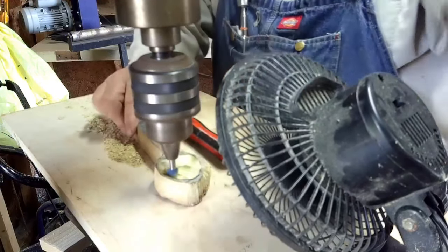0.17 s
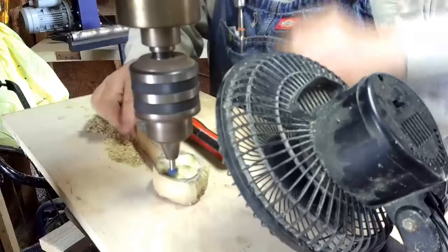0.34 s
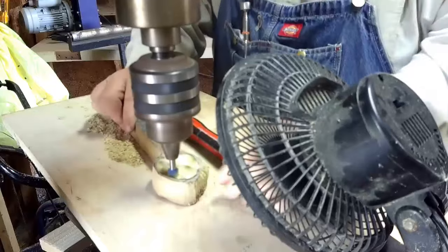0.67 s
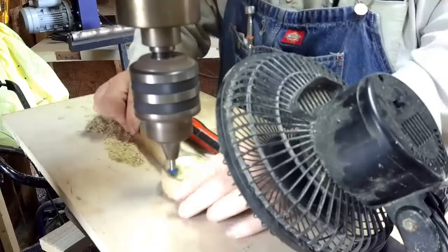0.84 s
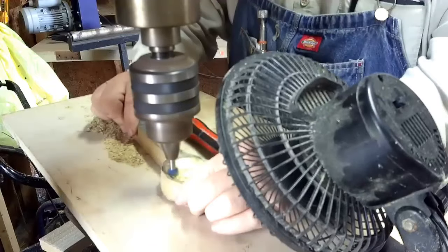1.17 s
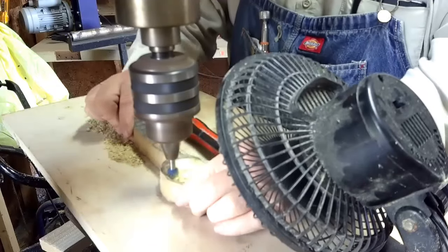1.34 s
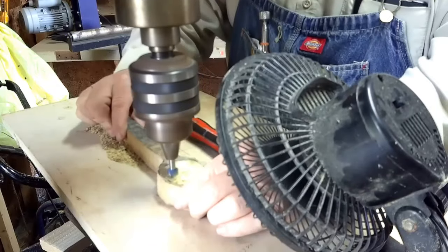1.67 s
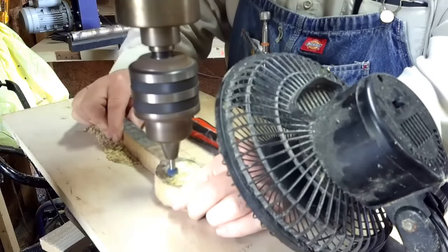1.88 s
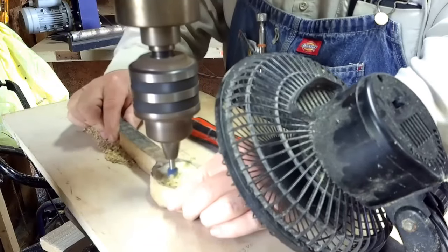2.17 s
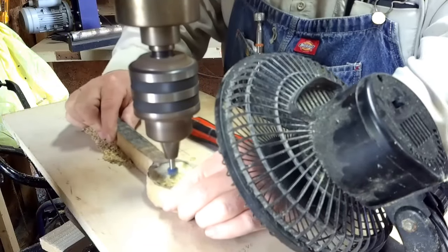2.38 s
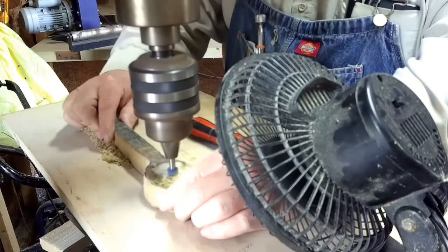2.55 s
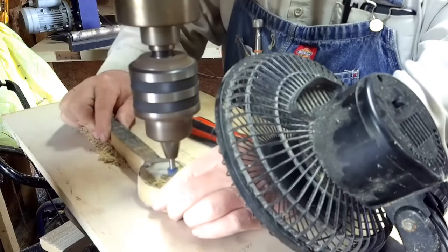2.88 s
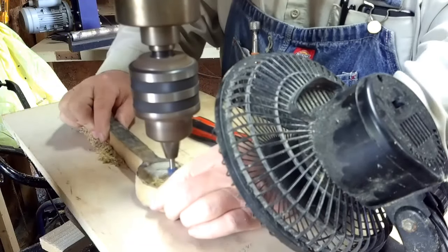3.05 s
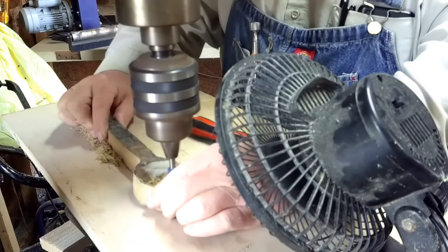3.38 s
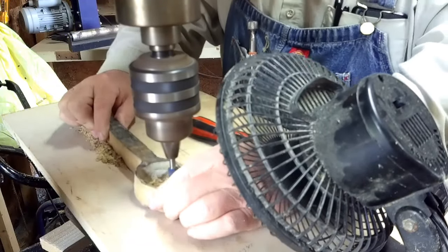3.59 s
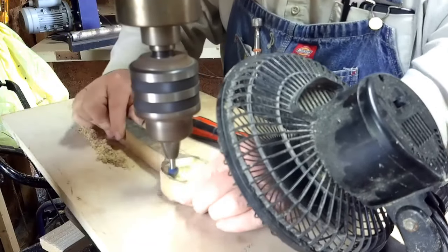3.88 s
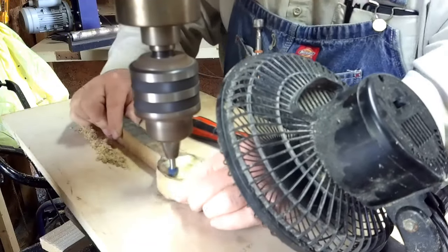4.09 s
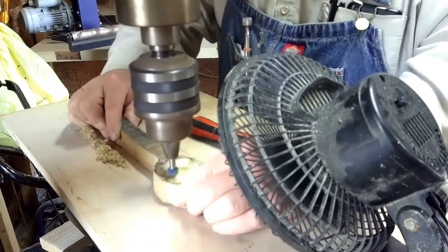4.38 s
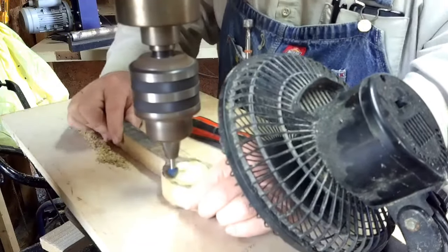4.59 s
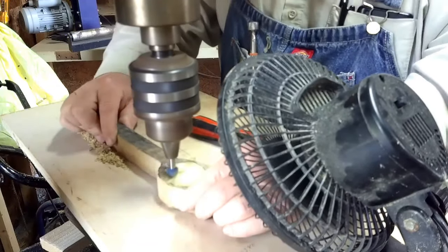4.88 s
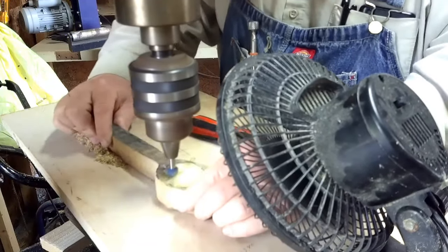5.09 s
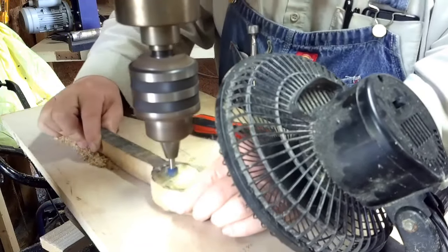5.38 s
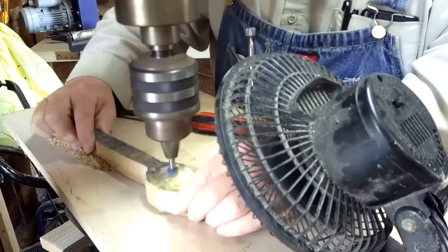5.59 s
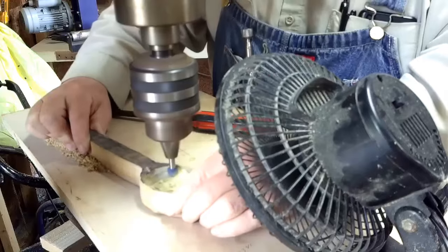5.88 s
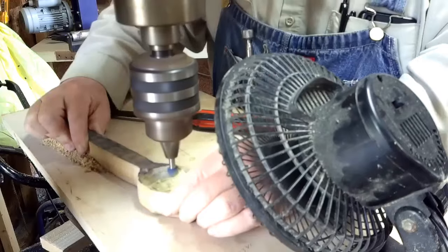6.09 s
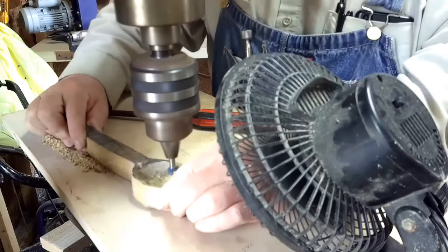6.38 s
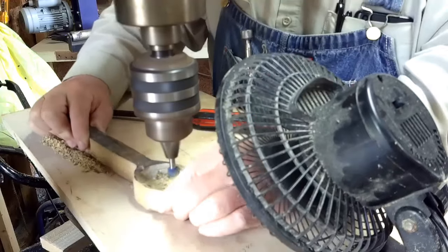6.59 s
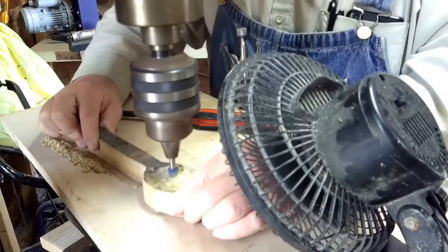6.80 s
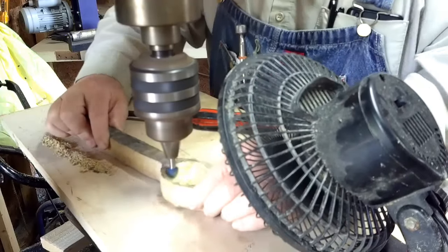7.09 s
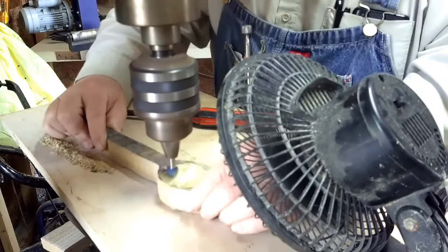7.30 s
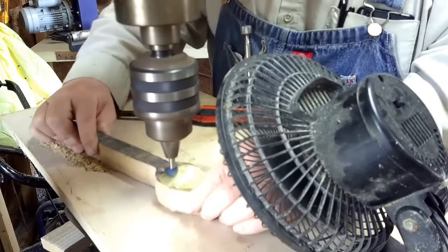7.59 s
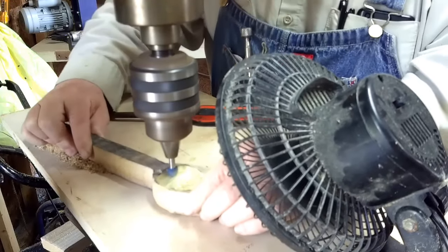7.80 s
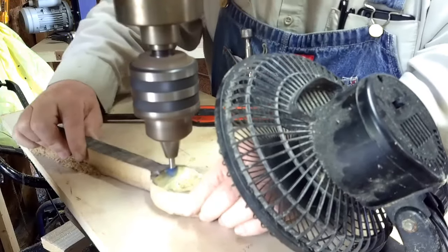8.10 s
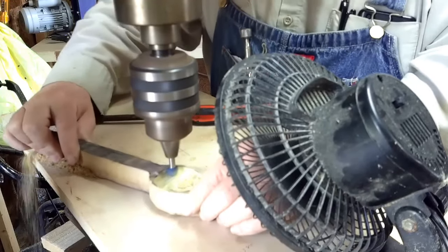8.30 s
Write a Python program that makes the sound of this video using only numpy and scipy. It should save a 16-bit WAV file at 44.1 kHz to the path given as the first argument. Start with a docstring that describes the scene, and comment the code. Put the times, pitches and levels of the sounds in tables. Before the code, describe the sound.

Close, sped-up wood carving on a drill press: a steady high whine, with repeated passes of buzzing hiss, squeals and short scrapes.

```python
"""A drill press spins a small carving burr in a block of wood, close up and in mono.
First it grinds in real time: the motor hums, rubbing rings the press, and the burr catches as it plunges.
After a short gap the work runs as a time-lapse, with hum and ringing pitched up by one factor.
Now, pass after pass, side pressure draws a whine from the spindle, the teeth strike into a pitched hiss,
and the block sings and chatters. Short scrapes and faint air from a bench fan run through both parts."""
import sys
import numpy as np
from scipy import signal
from scipy.fft import rfft, irfft, next_fast_len
from scipy.io import wavfile
from scipy.ndimage import uniform_filter1d

SR = 44100
rng = np.random.default_rng(int(sys.argv[2]) if len(sys.argv) > 2 else 0)


def file_out(sig):
    """Save sig as 16-bit WAV at sys.argv[1]."""
    # one column per channel
    cols = np.atleast_2d(sig).T
    # limit, then scale
    lim = np.clip(cols, -1, 1)
    pcm = np.round(lim * 32767).astype(np.int16)
    wavfile.write(sys.argv[1], SR, pcm)


N = 372644
T = np.arange(N) / SR

LAPSE = 3.729  # speed-up of the time-lapse; there it multiplies every f/Hz not marked "as heard"
REAL_END_S, LAPSE_START_S = 0.803, 0.821
SPINDLE_HZ = 52.96  # turns a second in real time

# resonances of press, table and block: f/Hz, width/Hz, height/dB
PRESS_RINGS = [(205.5, 9, 12.5), (241, 9.5, 22), (282.6, 21.2, 19.5), (315.7, 9.3, 15), (368.3, 33, 15.5),
               (421, 20, 12), (465, 14, 14), (528, 28.5, 8), (583, 8, 6.5), (619, 42, 8), (719, 21, 10.5),
               (760, 51, 7), (872, 123, 14.5), (996, 97, 8), (1180, 31, 4.5), (1271, 48, 8.5),
               (2030, 45, 4.5), (2650, 22, 7.5), (2776, 69, 5), (3020, 30, 0), (3530, 170, 6.5),
               (3900, 80, -7), (4530, 150, 7.5)]
# noise bed under the resonances, in real time and in the time-lapse: f/Hz, base level/dB per Hz
BED_REAL = [(25, -86), (80, -84), (130, -57), (200, -56), (300, -50), (560, -53), (1000, -50),
            (1250, -52.5), (1500, -50.5), (2050, -55), (2500, -53), (5100, -53), (6100, -65.5), (8300, -68),
            (9500, -78), (15500, -92)]
BED_LAPSE = [(16, -92.5), (60, -84), (90, -82.5), (125, -73.5), (180, -74.5), (260, -74.5), (480, -64),
             (900, -65), (1400, -65.5), (1900, -68.5), (2500, -65), (3200, -62.5), (3800, -67),
             (4200, -63.5)]
# force of the block on the burr in real time, a light touch and then the plunge: t/s, level/dB
FEED_FORCE = [(0, -4), (.04, -10), (.065, -4.5), (.12, -1.5), (.155, -8.5), (.28, -5), (.375, 2), (.5, 5.5),
              (.58, 3.5), (.67, -1.5), (.72, 4), (.8, 0.5)]
# the hand lets up for a moment: t/s, length/s, depth/dB
LET_UPS = [(0.861, 0.056, -8), (6.133, .19, -3.2)]
# passes of the burr round the hollow: start/s, end/s, whine gain/dB, squeal gain/dB, bite gain/dB
PASSES = [(.92, 1.522, -34.5, -41, -27.5), (1.533, 1.74, -30.5, -34, -27.5), (1.74, 2.143, -31, -40, -29.5),
          (2.163, 2.948, -29.5, -40, -31.5), (2.963, 3.35, -30.5, -48, -28.5),
          (3.354, 3.493, -36, -41, -29), (3.505, 3.62, -30, -37, -41), (3.717, 3.84, -32, -46, -30),
          (4.433, 4.626, -37, -43, -28.5), (4.633, 5.023, -30.5, -39, -30.5),
          (5.035, 5.33, -33.5, -38, -33), (5.33, 6.22, -32.5, -34.5, -29), (6.2, 6.617, -41, -42, -29.5),
          (6.802, 6.917, -28.5, -29.5, -31), (7.035, 7.2, -30, -29.5, -29), (7.22, 7.39, -30.5, -33, -31),
          (7.405, 7.862, -35, -30, -33.5), (7.858, 8.5, -37, -28, -36.5)]
# colour of one strike of the teeth: f/Hz, relative level/dB
STRIKE_COLOUR = [(300, -34), (800, -22), (1200, -4), (1400, -1), (1650, 2.5), (2000, 1), (2500, -0.5),
                 (2750, -4.5), (3200, -0.5), (4200, -13.5)]
# partials of the loaded spindle: multiple of its speed, level/dB against the whine gain
WHINE_PARTIALS = [(4, -16), (6, -12.5), (7, 1.5), (8, -21), (9, -27), (11, -14), (12, -5), (20, -8.5),
                  (22, -13), (24, -12)]
# the block sings as the teeth bite, the lowest tone at their strike rate:
# f/Hz as heard, level/dB against the bite gain, unsteadiness/0-1, waver/Hz
BITE_TONES = [(395, -31.5, 0.35, 2.2), (4220, -13.5, 0.8, 80), (7490, -9, 0.83, 100)]
# rough edge of the squeal: f/Hz as heard, level/dB against the squeal gain, unsteadiness/0-1, waver/Hz
SQUEAL_TONES = [(395, -22.5, 0.74, 2.4), (1942, -4, 1, 44), (2756, -7, 0.4, 15)]
# the block chatters and squeals under the burr: t/s, length/s, f/Hz as heard, level/dB, unsteadiness/0-1
CHATTER_TONES = [(.95, 0.71, 395, -52, .2), (1.74, .42, 767, -39, 0.53), (1.713, 0.46, 1930, -26, 0.95),
                 (1.878, 0.45, 2387, -30.5, 0.96), (2.3, 1.4, 797, -46, 0.4), (2.3, 0.85, 1274, -48, .3),
                 (3.0, .48, 7470, -32, 1), (3.15, 0.38, 6680, -33, 0.9), (3.15, 0.35, 5900, -34, 0.8),
                 (4.55, 0.21, 787, -40, .3), (5.13, 0.26, 750, -45, 0.3), (5.13, 0.27, 1930, -29, .8),
                 (5.5, 1.1, 7460, -32, 0.7), (5.45, 0.81, 5890, -39, 1), (5.55, .7, 790, -44, .2),
                 (6.19, 0.1, 5480, -30, 1), (6.19, .11, 5900, -35, 0.8), (7.33, 0.3, 1184, -37, 0.1),
                 (7.947, 0.64, 2820, -28.5, 0.6)]
# the burr catches: t/s, length/s, centre/Hz as heard, width/Hz as heard, rasp level/dB, thump level/dB
SCRAPES = [(0.05, 0.019, 4860, 1500, -15.5, -60), (0.489, 0.027, 4460, 2400, -5, -42),
           (0.612, 0.036, 3620, 1500, -10, -60), (0.734, 0.022, 4700, 2000, -18, -60),
           (0.816, 0.061, 9100, 9000, -17.5, -50), (3.312, 0.026, 8200, 2500, -22, -70),
           (3.369, 0.15, 7600, 1400, -23, -70), (3.715, 0.049, 7500, 3500, -23.5, -50),
           (3.848, .035, 7800, 1800, -27, -62), (3.908, 0.028, 7000, 6000, -20, -44),
           (4.445, 0.026, 7550, 1500, -22, -66), (5.28, .035, 5000, 4000, -36, -52),
           (6.003, 0.23, 10100, 2000, -25, -58), (6.395, 0.035, 5560, 3000, -19, -53),
           (6.472, 0.04, 7000, 2500, -22, -62), (6.519, 0.053, 7660, 1100, -25, -51),
           (6.86, .045, 8000, 2200, -23.5, -50), (7.021, 0.04, 8500, 3500, -23.5, -48),
           (7.022, 0.13, 1900, 900, -25, -70)]
# motor hum in real time: f/Hz, base level/dB, unsteadiness/0-1
HUM_REAL = [(120, -37, 0.1), (240, -18, 0.15), (360, -20.3, 0.2)]
# fader on that hum, which sinks as the burr digs in: t/s, gain/dB
HUM_FADER = [(0, -7), (.04, -6), (.09, 5.5), (.15, -6), (.19, 5), (.27, 2), (.38, 2), (.46, -5), (.7, -5),
             (.78, -12)]
# motor and bearing tones in the time-lapse: f/Hz, level/dB, unsteadiness/0-1
HUM_LAPSE = [(116.2, -58, .2), (120, -59, .2), (232.8, -34, .1), (240, -30.7, .1), (360, -41, .4),
             (760.6, -39, .5), (128, -58, .2), (142.5, -60, .4), (193.8, -59, .3), (264.7, -49, .4),
             (269.6, -48, .4), (277.5, -47, .5), (423.6, -45, .6), (2463.2, -52, .7), (3002.2, -48, .7),
             (3498.3, -44, .8), (3704.9, -51, .7), (3954.1, -51, .7), (4201.5, -52, .7)]
# air from the bench fan on the microphone: t/s, level/dB before gusts
FAN_AIR = [(0, -62), (.33, -64), (.37, -44), (.44, -48), (.5, -36), (.56, -50), (.8, -51), (.88, -59),
           (8.45, -64)]


def press(speed, bed, force_db, drone_db, patchy_db, flicker_db, throb, ripple_db):
    """Rubbing noise rings the press; it throbs once a turn and flickers as the wood grain passes."""
    hz, t, spectrum = signal.stft(rng.standard_normal(N), SR, nperseg=1024, noverlap=768)
    hz = hz[:, None] / speed  # real-time pitch
    db = level_at(bed, hz)
    db = db + sum(height / (1 + (2 * (hz - f) / width) ** 2) for f, width, height in PRESS_RINGS)
    # force brightens the sound: it lifts the drone a little, chuck rattle more, grinding hiss most
    force = np.interp(t, T, force_db)
    to_rattle = np.clip((hz - 600) / 130, 0, 1)
    to_hiss = np.clip((hz - 2500) / 400, 0, 1)
    drone = np.clip(hz / 400, 0, 1) * (1 - to_rattle) * (drone_db + 0.2 * force)
    rattle = to_rattle * (1 - to_hiss) * 0.55 * force
    hiss = to_hiss * force
    patches = uniform_filter1d(rng.standard_normal(spectrum.shape), 24, axis=0)
    patches = unit_rms(uniform_filter1d(patches, 7, axis=1))  # bands swell and fade at random
    # reflections from table and shop comb the upper range with a fine, static ripple
    comb = rng.standard_normal(len(hz))
    ripple = unit_rms(uniform_filter1d(comb, size=2) - uniform_filter1d(comb, size=7))[:, None]
    db = db + drone + rattle + hiss + patchy_db * patches + ripple_db * to_rattle * ripple
    grind = np.sqrt(SR / 2) * signal.istft(spectrum * amp(db), SR, nperseg=1024, noverlap=768)[1][:N]
    turn = np.cos(2 * np.pi * SPINDLE_HZ * speed * T)
    return grind * (1 + throb * turn) * amp(flicker_db * drift(11 * speed).real)


def steady_feed(wander_db=0.3):
    """The hand's force on the block in the time-lapse, in dB: held, wandering, now and then eased."""
    let_ups = sum(db * swell(start, length, T) for start, length, db in LET_UPS)
    return let_ups - wander_db * drift(rate_hz=3).real


def pass_gains(glide_s=0.057):
    """Faders for whine, squeal and bite: each pass rises from grazing, holds and falls back."""
    grazing = amp([[-46], [-49], [-43]])
    gains = grazing * np.ones(N)
    for start, end, *db in PASSES:
        held = np.clip(0.5 + np.minimum(T - start, end - T) / glide_s, 0, 1)
        gains += (amp(db)[:, None] - grazing) * held
    return gains


def teeth(bite, strike_db=2.5, slip=0.00723, uneven=0.79, smear_s=0.0029, dust=0.57):
    """The burr strikes about twice a turn; slipping timing blurs the top into a pitched hiss."""
    period = 1 / (2 * SPINDLE_HZ * LAPSE * 0.997)
    late, size = rng.standard_normal((int(T[-1] / period), 2)).T
    onsets = np.cumsum(period * (1 + slip * late)) * SR
    taps = onsets.astype(int)[:, None] + np.arange(-8, 9)
    clicks = np.sinc(taps - onsets[:, None]) * (1 + uneven * size[:, None])
    strikes = np.zeros(N)
    np.add.at(strikes, np.clip(taps, 0, N - 1), clicks)
    # the block smears each strike over a few milliseconds without colouring it
    burst = rng.standard_normal(1024) * np.exp(-T[:1024] / smear_s)
    smear = irfft(np.exp(1j * np.angle(rfft(burst))))
    drive = unit_rms(signal.oaconvolve(strikes, smear)[:N]) + dust * rng.standard_normal(N)
    buzz = coloured(drive, lambda hz: amp(level_at(STRIKE_COLOUR, hz / LAPSE)))
    return bite * amp(strike_db) * unit_rms(buzz)


def whine(pressure, squeal, flutter=0.16, flutter_hz=40, waver_hz=4):
    """Side pressure brings out spindle harmonics, the higher the rougher; the tenth squeals alone."""
    hz = SPINDLE_HZ * LAPSE
    stack = sum(amp(db) * tone(k * hz, 0.1 + 0.038 * k, waver_hz + 0.3 * k) for k, db in WHINE_PARTIALS)
    stack *= 1 + flutter * np.cos(2 * np.pi * flutter_hz * T)  # the whine beats against the motor
    return pressure * stack + squeal * amp(-3) * tone(10 * hz, unsteady=0.48, waver_hz=7)


def singing(tones):
    """The block sings under the burr in a cluster of wavering tones."""
    return sum(amp(db) * tone(hz, unsteady, waver_hz) for hz, db, unsteady, waver_hz in tones)


def chatter():
    """Passing tones of the block shaking in the hand; the rough ones waver faster."""
    out = np.zeros(N)
    for start, length, hz, db, rough in CHATTER_TONES:
        part = slice(int(start * SR), int((start + length) * SR))
        out[part] += amp(db) * swell(start, length, T[part]) * tone(hz, rough, 35 * rough, T[part])
    return out


def scrapes(thump_hz=200, grain_db=1.5):
    """Short grainy rasps as the burr catches, with a dull push on the table."""
    out = np.zeros(N)
    for start, length, centre, width, rasp_db, thump_db in SCRAPES:
        def rasp_band(hz):
            return np.minimum(hz / 1500, 1) ** 2 / (1 + abs(2 * (hz - centre) / width) ** 3.4)

        part = slice(int(start * SR), int((start + length) * SR))
        chips, clumps = rng.standard_normal((2, SR))[:, :part.stop - part.start]
        chips = chips * amp(-grain_db * unit_rms(uniform_filter1d(clumps, size=60)))
        rasp = unit_rms(coloured(chips, rasp_band))
        shape = np.sin(np.pi * np.linspace(0, 1, len(chips)) ** 0.81)  # quick catch, slower release
        out[part] += shape * (amp(rasp_db) * rasp + amp(thump_db) * dulled(chips, thump_hz))
    return out


def motor(speed, hum, waver_hz):
    """Mains hum and bearing tones, pitched up by the speed."""
    return sum(amp(db) * tone(hz * speed, unsteady, waver_hz) for hz, db, unsteady in hum)


def fan(gust_db=5):
    """Faint lumpy rumble of moving air."""
    air = dulled(rng.standard_normal(N), corner_hz=270)
    return amp(automation(FAN_AIR) + gust_db * drift(rate_hz=11).real) * air


def amp(db):
    return 10 ** (np.asarray(db) / 20)


def unit_rms(x):
    return x / np.sqrt(np.mean(abs(x) ** 2) + 1e-20)


def level_at(points, hz):
    """An EQ curve: straight lines between points on a log-frequency axis."""
    f, db = np.transpose(points)
    return np.interp(np.log(hz + 1), np.log(f + 1), db)


def automation(points):
    """A fader ride: straight lines between points in time."""
    return np.interp(T, *np.transpose(points))


def coloured(x, gain):
    """Filters x by a gain given as a function of frequency."""
    size = next_fast_len(len(x))
    return irfft(rfft(x, size) * gain(np.fft.rfftfreq(size, 1 / SR)), size)[:len(x)]


def dulled(x, corner_hz):
    """Rolls off the top and sets the rms to 1."""
    return unit_rms(coloured(x, lambda hz: 1 / (1 + (hz / corner_hz) ** 2)))


def drift(rate_hz, t=T, size=8192):
    """A complex random modulator of rms 1, rolling off above rate_hz."""
    f = np.fft.fftfreq(size, T[-1] / size)
    noise = rng.standard_normal((size, 2)) @ [1, 1j]
    slow = np.fft.ifft(np.fft.fft(noise) / (1 + (f / rate_hz) ** 2))
    return np.interp(t, np.linspace(0, T[-1], size), unit_rms(slow))


def tone(hz, unsteady, waver_hz, t=T):
    """A tone of rms about 1, part steady and part wavering."""
    share = np.clip(unsteady, 0, 1)
    envelope = np.sqrt(1 - share ** 2) + share * drift(waver_hz, t)
    return np.sqrt(2) * (envelope * np.exp(2j * np.pi * hz * t)).real


def swell(start, length, t):
    """A quick rise, a plateau and a fall."""
    return np.tanh(2 * np.sin(np.pi * np.clip((t - start) / length, 0, 1)))


def scene():
    """Real time, a short gap, then the time-lapse."""
    real = press(1, BED_REAL, automation(FEED_FORCE),
                 drone_db=2, patchy_db=1.5, flicker_db=0.5, throb=0.12, ripple_db=2.5)
    real += amp(automation(HUM_FADER)) * motor(1, HUM_REAL, waver_hz=8.4)
    pressure, squeal, bite = pass_gains()
    lapse = amp(-0.5) * press(LAPSE, BED_LAPSE, steady_feed(),
                              drone_db=-0.45, patchy_db=0.88, flicker_db=1.5, throb=0.042, ripple_db=1.5)
    lapse += motor(LAPSE, HUM_LAPSE, waver_hz=3.4) + whine(pressure, squeal) + teeth(bite) + chatter()
    lapse += bite * singing(BITE_TONES) + squeal * singing(SQUEAL_TONES)
    gate = np.clip(np.maximum(REAL_END_S - T, T - LAPSE_START_S) * 1000, 0, 1)  # 1 ms fades at the gap
    mono = gate * (np.where(T < REAL_END_S, real, lapse) + scrapes() + fan())
    return np.array([mono, mono])


def record(dry):
    """Clips peaks at full scale, then cuts the very top with a steep low-pass."""
    low_pass = signal.firwin(1023, cutoff=15800, window=("kaiser", 9), fs=SR)
    return signal.oaconvolve(np.clip(dry, -1, 1), low_pass[None], "same")


dry = scene()
out = record(dry)
file_out(out)
```